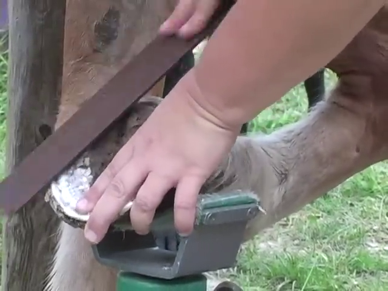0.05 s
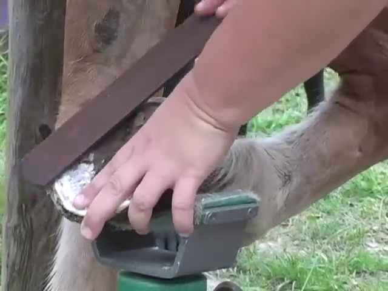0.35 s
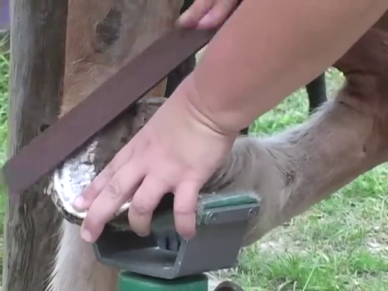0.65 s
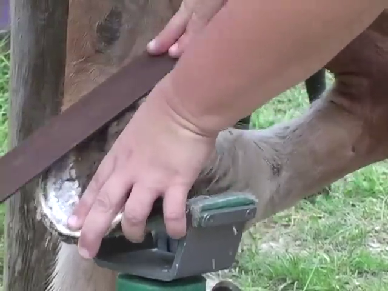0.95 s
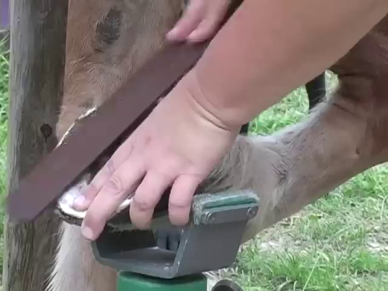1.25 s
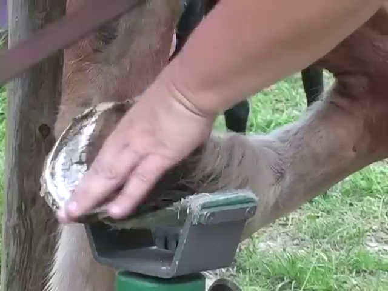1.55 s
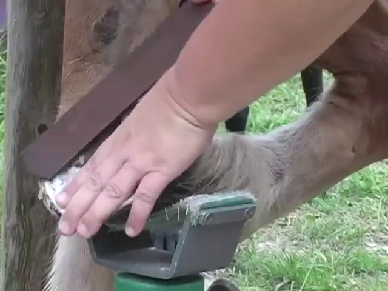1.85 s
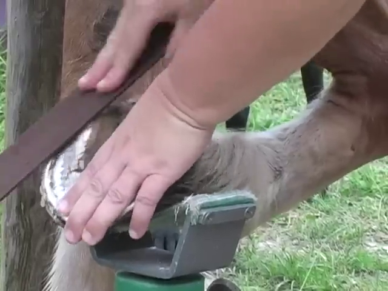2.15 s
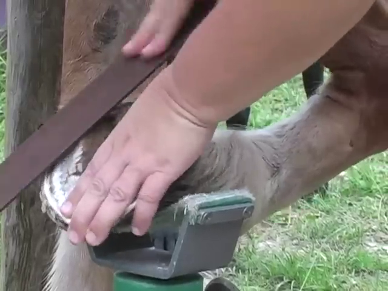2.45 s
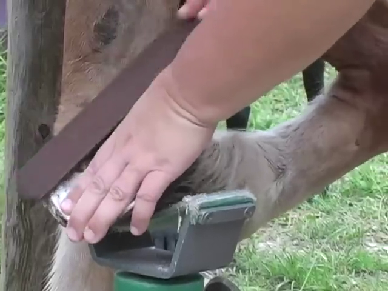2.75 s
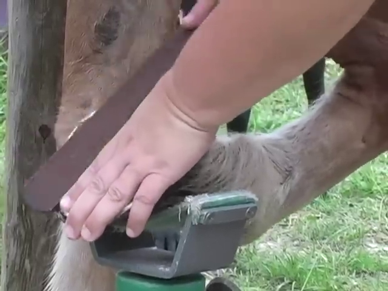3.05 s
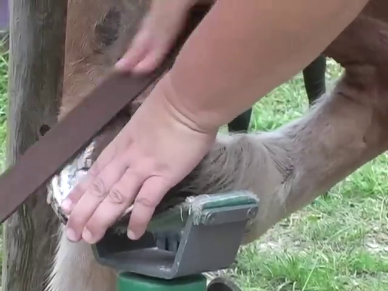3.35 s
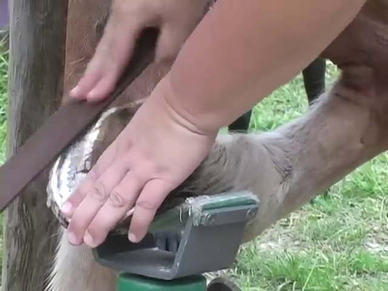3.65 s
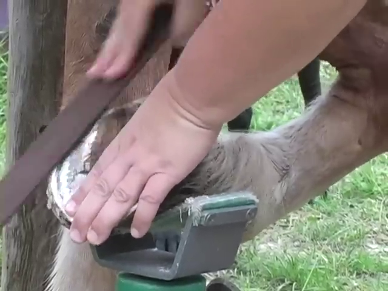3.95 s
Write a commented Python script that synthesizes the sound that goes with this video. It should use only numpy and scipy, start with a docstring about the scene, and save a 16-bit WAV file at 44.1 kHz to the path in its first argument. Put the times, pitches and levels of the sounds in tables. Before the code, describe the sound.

Close, rhythmic filing of a horse's hoof outdoors, with low thumps and sharp clicks.

```python
"""Outdoors in quiet open air, one microphone close to a horse's hoof on a farrier's stand.
A steel rasp pushes heavily and drags back lightly, with one pause while the hand shifts its hold.
The teeth tear the horn in thousands of tiny cuts that ring the blade; coarser slips thump the hoof.
Now and then the rasp snags or judders, and a few sharp clicks stand out.
Nearby surfaces give a faint, dull echo; behind it all lie a soft hush and a low hum."""
import sys
import numpy as np
from scipy import signal
from scipy.fft import rfft, irfft, next_fast_len
from scipy.io import wavfile
from scipy.ndimage import uniform_filter1d, map_coordinates

SR = 44100
rng = np.random.default_rng(int(sys.argv[2]) if len(sys.argv) > 2 else 0)


def wav_out(sig):
    """Save sig, one row per channel (or a flat mono array), as 16-bit PCM at SR to the path in sys.argv[1]."""
    wavfile.write(sys.argv[1], SR, np.round(np.clip(np.atleast_2d(sig).T, -1, 1) * 32767).astype(np.int16))


N = 176400  # 4 s
CHATTER_PER_S, CONTACT_PER_S = 105.1, 28  # how fast the teeth's grip and the contact point wander


def amp(db):
    """Decibels to gain."""
    return 10 ** (np.asarray(db) / 20)


def rms(x):
    """Root-mean-square level."""
    return np.sqrt(np.mean(x ** 2) + 1e-20)


def unit(x):
    """Scale to rms 1."""
    return x / rms(x)


def peak(x):
    """Scale to peak 1."""
    return x / np.abs(x).max()


def bell(x, centre, width):
    """A Gaussian bump of height 1."""
    return np.exp(-.5 * ((x - centre) / width) ** 2)


def along(points, hz):
    """Interpolate (frequency, value) points on a log frequency axis."""
    f, v = np.transpose(points)
    return np.interp(np.log(hz + 1), np.log(f + 1), v)


def wobble(rate, size):
    """A smooth random curve with `rate` knots a second."""
    return map_coordinates(rng.standard_normal(4096), [np.arange(size) * rate / SR], mode="wrap")


def filtered(x, response):
    """Pass x through a complex response of frequency."""
    m = next_fast_len(len(x) + 4096)
    return irfft(rfft(x, m) * response(np.fft.rfftfreq(m, 1 / SR)), m)[:len(x)]


def causal(db):
    """The minimum-phase response that has these gains on an FFT grid."""
    cepstrum = irfft(np.log(amp(db)))
    cepstrum[1:len(db) - 1] *= 2
    cepstrum[len(db):] = 0
    return np.exp(rfft(cepstrum))


def ring(x, modes):
    """Pass x through resonances of alternating sign (frequency [Hz], width [Hz], gain [dB])."""
    return filtered(x, lambda f: sum(
        (-1) ** k * amp(db) * 1j * f * width / (hz * hz - f * f + 1j * f * width)
        for k, (hz, width, db) in enumerate(modes)))


def add(track, start_s, sound):
    """Mix a sound into the track at start_s."""
    part = track[round(start_s * SR):][:len(sound)]
    part += sound[:len(part)]


def impacts(rate, size, scatter_db):
    """Randomly timed impulses of uneven strength, about `rate` a second."""
    hits = (rng.random(size) < rate / SR) * rng.choice([-1, 1], size)
    return hits * amp(scatter_db * rng.standard_normal(size))


# Open air all around the microphone (frequency [Hz], relative level [dB])
AIR_SPECTRUM = [(20, -33), (45, -8.5), (80, -14.5), (200, -12.5), (290, -21.5), (600, -28), (1200, -31),
                (2000, -34.5), (4000, -38.5), (7000, -44), (16000, -48.5)]

def air():
    """The background: a quiet hush, a high band like far insects and a faint, wavering hum."""
    hush = unit(filtered(rng.standard_normal(N), lambda f: amp(along(AIR_SPECTRUM, f))))
    insects = unit(filtered(rng.standard_normal(N), lambda f: bell(f, centre=8030, width=380)))
    hum_hz = 80.3 + 2 * wobble(5.97, N)
    hum = np.sin(2 * np.pi * np.cumsum(hum_hz) / SR)
    return amp(-45 + wobble(6.37, N)) * hush + amp(-64) * insects + amp(-42.5 + 1.4 * wobble(4.1, N)) * hum


def echo(work, db=-15, t60_s=.22, top_hz=1500, delay_s=.003):
    """Nearby surfaces send a faint, dull answer back to the microphone."""
    t = np.arange(SR // 4) / SR
    tail = rng.standard_normal(len(t)) * amp(-60 * t / t60_s) * (t > delay_s)
    tail = filtered(tail / np.linalg.norm(tail), lambda f: 1 / (1 + 1j * f / top_hz) ** 2)
    return amp(db) * signal.fftconvolve(work, tail)[:N]


def hand_shift(lift_s=1.42, ring_t60_s=2.2, slide_start_s=1.4, slide_length_s=.32, rub_hz=1860):
    """The lifted blade rings on faintly while the hand slides to a new hold on the hoof."""
    out, t = np.zeros(N), np.arange(SR) / SR
    add(out, lift_s, amp(-54 - 60 * t / ring_t60_s) * np.sin(2 * np.pi * BLADE_MODE_HZ[1] * t))
    slide = np.sqrt(np.abs(np.sin(np.pi * np.minimum(t / slide_length_s, 1))))
    rub = unit(ring(rng.standard_normal(SR), [(rub_hz, rub_hz / 2, 0)]))
    add(out, slide_start_s, amp(-59 + 1.3 * wobble(20, SR)) * slide * rub)
    return out


# Sharp clicks close to the microphone (time [s], peak level [dB], treble lift [dB])
CLICK_HITS = [(0.284, -24, 43), (0.558, -26, 12), (0.6084, -1.5, -0.5), (.712, -18, -23),
              (0.992, -21.5, 22), (1.196, -28.5, 27), (1.708, -32, 31), (1.879, -28.5, 11),
              (2.508, -13.5, 28), (2.602, -28, 33)]
# Resonances of a click (frequency [Hz], width [Hz], gain [dB])
CLICK_RESONANCES = [(970, 51, 0.5), (1197, 62, 2.5), (1480, 360, 2), (1900, 100, 3.5), (2420, 220, 8),
                    (3010, 450, 4), (3480, 310, 7.5), (4180, 390, 3), (5200, 690, -5.5)]
# Overall tone of a click (frequency [Hz], gain [dB])
CLICK_SPECTRUM = [(200, -39), (900, 7), (4300, -2), (7000, -2), (16000, -18)]
# Shape of a treble lift, for clicks and the scrape (frequency [Hz], share of the lift [0-1])
LIFT_SHAPE = [(2500, 0), (9000, 1)]

def clicks(rattle_gain=.08, rattle_t60_s=.031):
    """Hard, short contacts, each with a brief rattle after it."""
    out, t = np.zeros(N), np.arange(SR // 8) / SR
    for start, db, treble_db in CLICK_HITS:
        rattle = rattle_gain * rng.standard_normal(len(t)) * amp(-60 * t / rattle_t60_s)
        click = ring((t == 0) + rattle, CLICK_RESONANCES)
        click = filtered(click, lambda f: causal(along(CLICK_SPECTRUM, f) + treble_db * along(LIFT_SHAPE, f)))
        add(out, start, amp(db) * peak(click))
    return out


# The hoof on its stand (frequency [Hz], width [Hz], gain [dB])
HOOF_MODES = [(89.3, 58, -10.5), (163.1, 21.1, 0.5), (217.8, 46, -7.5), (378, 43.6, -16.5),
              (567.4, 22.4, -14.5)]

def hoof(force):
    """Hoof and stand answer a force with a low thump."""
    return ring(force, HOOF_MODES)


def stand_rocking(stroke_share=.36, width_s=.016):
    """Early in each push the weight comes on and rocks the stand in its lowest mode."""
    t = np.arange(N) / SR
    swell = sum(amp(thump_db - .5) * bell(t, start + stroke_share * (end - start), width_s)
                for start, end, *_, thump_db, _, _, _ in PUSH_STROKES)
    rock_hz = HOOF_MODES[0][0] * (1 + .152 * wobble(CONTACT_PER_S, N))
    return swell * np.sin(2 * np.pi * np.cumsum(rock_hz) / SR)


# The steel blade's modes, in two matching lists (frequency [Hz]) and (gain [dB])
BLADE_MODE_HZ = [950, 1497, 2090, 2425, 2830, 3632, 4502, 5410, 6490, 7690, 8910]
BLADE_MODE_DB = [-6, 1.5, 5, 2.5, 5.5, 6.5, 6, 0.5, -4, -5, -6]

def blade(force, width_hz=28, zing_hz=10785, zing_width_hz=44, contact_db=5):
    """The steel's ring and its high zing; each mode's drive varies as the contact slides along."""
    def drive():
        return force * amp(contact_db * np.clip(wobble(CONTACT_PER_S, len(force)), -2, 1))
    body = sum(ring(drive(), [(hz, width_hz, db)]) for hz, db in zip(BLADE_MODE_HZ, BLADE_MODE_DB))
    zing = ring(drive(), [(zing_hz, zing_width_hz, 0)])
    return body, zing


# Judders within the pushes (start [s], end [s], slip rate [Hz], level [dB])
JUDDER_SPANS = [(.11, .175, 184, -23), (2.075, 2.14, 213, -23), (2.84, 2.919, 168, -26.5),
                (3.25, 3.312, 169, -22), (3.54, 3.595, 163, -21), (3.61, 3.675, 158, -22)]

def judders(jitter=.076):
    """The teeth stick and slip near the hoof's resonances, making a short, uneven drone."""
    out = np.zeros(N)
    for start, end, slip_hz, db in JUDDER_SPANS:
        size = round((end - start) * SR)
        turns = np.cumsum(slip_hz * (1 + jitter * wobble(CHATTER_PER_S, size))) / SR
        swell = np.sin(np.linspace(0, np.pi, size))
        add(out, start, amp(db) * unit(np.sin(2 * np.pi * turns) * swell))
    return out


# The rasp lands or snags, heard close (time [s], grip change [dB], thump [dB], crunch [dB])
SNAG_HITS = [(.712, 18, -26.5, -25.5), (0.817, 12, -36, -42), (0.828, 10, -22, -47),
             (0.842, 15, -11, -21.5), (0.871, 10.5, -25, -29), (.882, 17.5, -22, -19.5),
             (.894, 5, -18, -17), (.908, 15.5, -25, -30), (1.29, 3.5, -12.5, -37), (1.315, 6, -13, -15.5),
             (1.364, 9, -17.5, -20), (1.386, 6, -12, -43), (1.409, 15, -22, -35), (1.88, -5, -12.5, -21.5),
             (2.047, -12, -9, -21.5), (2.428, 6.5, -24, -27), (2.447, 5, -11.5, -16), (2.464, 14, -35, -15),
             (2.486, 10.5, -7.5, -9), (2.507, 10.5, -8, -38), (2.527, -1, -14.5, -9),
             (2.547, -4, -11, -13.5), (2.565, -2, -17.5, -17), (2.792, -0.5, -12.5, -28),
             (3.167, 4, -13, -40), (3.195, 0.5, -13, -33)]
# The dull crunch of a snag (frequency [Hz], relative level [dB])
CRUNCH_SPECTRUM = [(100, -19), (350, -4), (600, 4), (1000, 1), (1700, -10), (3000, -24.5), (8000, -36)]

def snags(contact_s=.0018, crunch_t60_s=.091, ping_db=-19):
    """A tooth catches and breaks free: a soft knock on the hoof, a crunch and a ping of the blade."""
    out, t = np.zeros(N), np.arange(SR // 4) / SR
    knock = peak(hoof(np.sin(np.pi * t / contact_s) ** 2 * (t < contact_s)))
    for start, _, thump_db, crunch_db in SNAG_HITS:
        burst = rng.standard_normal(len(t)) * amp(-60 * t / crunch_t60_s)
        crunch = peak(filtered(burst, lambda f: causal(along(CRUNCH_SPECTRUM, f))))
        body, zing = blade(t == 0)
        ping = amp(ping_db) * peak(peak(body) + peak(zing))  # relative to the crunch
        add(out, start, amp(thump_db) * knock + amp(crunch_db) * (crunch + ping))
    return out


def snag_grip_db(t, width_s=.0036):
    """A snag changes the grip of the teeth for a few milliseconds, most often tightening it."""
    return sum(db * bell(t, when, width_s) for when, db, _, _ in SNAG_HITS)


# Tone curves scaled by a stroke's treble and bite (frequency [Hz], gain per dB of setting [dB])
TREBLE_CURVE = [(3000, -2), (9000, 1)]
BITE_CURVE = [(700, -0.69), (1500, -0.43), (2800, -0.11), (4200, -0.33), (8000, 0.29)]

def tearing_horn(cuts, speed, length_s, treble_db, bite_db, opening_db=6, ripple_db=4):
    """The tone of the tiny cuts flickers in patches, and the top opens as the stroke goes on."""
    hz, when, spectrum = signal.stft(cuts, SR, nperseg=512)
    hz = hz[:, None]
    patches = uniform_filter1d(rng.standard_normal(spectrum.shape), 3, axis=0)
    patches = unit(uniform_filter1d(patches, 10, axis=1))
    slowness = 1 - np.interp(when, np.arange(len(cuts)) / SR, speed)
    tilt_db = along(TREBLE_CURVE, hz) * (treble_db - .5 * slowness) + along(BITE_CURVE, hz) * bite_db
    top_db = along(LIFT_SHAPE, hz) * opening_db * (np.minimum(when / length_s, 1) - .5)
    spectrum = spectrum * amp(tilt_db + top_db + ripple_db * patches)
    return signal.istft(spectrum, nperseg=512)[1][:len(cuts)]


def stroke(row, colour, thump_swell, cuts_per_s=5000, slips_per_s=260, size=16384):
    """The rasp speeds up and slows: fine cuts scrape and ring the blade, coarse slips thump the hoof."""
    start, end, fastest, swell, scrape_db, bite_db, treble_db, thump_db, ring_db, zing_db, chatter_db = row
    t, length_s = np.arange(size) / SR, end - start
    travel = np.interp(t, [0, length_s * np.clip(fastest, .1, .9), length_s], [0, .5, 1])
    speed = np.abs(np.sin(np.pi * travel)) * (travel < 1)
    chatter = np.clip(wobble(CHATTER_PER_S, size), -2, 2)
    grip = amp(chatter_db * chatter + .5 * wobble(699.7, size))
    force = speed ** swell * amp(snag_grip_db(start + t))
    weight = speed ** thump_swell
    cuts = impacts(cuts_per_s, size, scatter_db=2.5)
    torn = tearing_horn(cuts, speed, length_s, treble_db, bite_db)
    scrape = filtered(torn * force * grip, lambda f: causal(along(colour, f)))
    slips = impacts(slips_per_s, size, scatter_db=3) + .33 * impacts(cuts_per_s, size, scatter_db=1)
    thump = amp(thump_db) * unit(hoof(slips * grip * weight))
    body, zing = blade(cuts * force * grip)
    steel = amp(ring_db) * unit(body) + amp(zing_db) * unit(zing * speed)
    return rms(force) * (amp(scrape_db) * unit(scrape) + steel) + rms(weight) * thump


# Heavy pushes and light returns, close to the microphone; levels hold at full force
# (start [s], end [s], fastest point [share of stroke], swell [exponent], scrape [dB], bite [dB],
#  treble [dB], thump [dB], blade ring [dB], zing [dB], chatter depth [dB])
PUSH_STROKES = [(.041, 0.194, 0.35, 0.56, -23.5, 1, -1.5, -20, -37, -42, 0.2),
                (0.41, 0.556, 0.62, 0.87, -22.5, 1, -1.5, -20.5, -39, -35, 2),
                (0.813, 0.931, 0.078, 0.16, -40, 0.5, -1.5, -21.5, -54, -47.5, 1.5),
                (1.204, 1.418, 0.54, 1.12, -29.5, 3.5, -3.5, -26, -45, -43.5, 3),
                (1.942, 2.162, 0.75, 0.87, -26.5, 1, -1.5, -22, -42, -40, 0.5),
                (2.397, 2.551, 0.34, 0.24, -34, 4, -1.5, -19.5, -42.5, -40, 2.5),
                (2.773, 2.917, 0.64, 0.43, -25, -5, 0.5, -24, -33.5, -43, 1),
                (3.148, 3.311, 0.6, 0.7, -25.5, -6, -0.5, -24, -36, -43.5, -0.5),
                (3.51, 3.671, 0.62, 1, -23, -10.5, 2, -26.5, -37.5, -44, 0.5),
                (3.902, 4.053, 0.26, 0.86, -24, -4, 0, -24, -37.5, -42, 2)]
RETURN_STROKES = [(0.218, 0.379, 0.52, 1.6, -32.5, 1.8, -3, -37.5, -39.5, -41.5, 1.5),
                  (0.624, 0.739, 0.085, 2.12, -34, -1, -1, -31.5, -38.5, -41.5, 1.4),
                  (1.047, 1.186, 0.56, 0.8, -41, 0, -2.5, -35.5, -52, -67, 3.9),
                  (2.2, 2.359, 0.49, 1.1, -32, 2.5, -2, -33, -42.5, -44, 0.72),
                  (2.602, 2.737, 0.39, 1.8, -29, -8.5, 0, -30.5, -41, -42, 0.38),
                  (2.94, 3.107, 0.62, 1.3, -33, -8, -2.5, -37, -39, -48, 1.3),
                  (3.321, 3.495, 0.42, 1.83, -29.5, -3, -2.5, -41.5, -38.5, -45, 1.5),
                  (3.69, 3.85, 0.46, 1.5, -29.5, -4.5, -2, -37.5, -39, -45, 0.9)]
# The scrape of the horn in each direction (frequency [Hz], relative level [dB])
PUSH_SPECTRUM = [(60, -25), (200, -11.5), (340, 0), (480, -9.5), (580, -3), (700, -6), (900, -8.5),
                 (1100, -13), (1650, -7), (2200, -15.5), (2900, -9), (4100, -11.5), (4700, -15.5),
                 (12000, -21.5), (16000, -29.5)]
RETURN_SPECTRUM = [(100, -48), (260, -4.5), (380, -5.5), (520, -0.5), (800, -8), (1150, -10), (1500, -6),
                   (2300, -16), (4200, -12), (5400, -19.5), (12000, -22), (16000, -26)]

def rasping():
    """Pushes cut deep; returns skate over the horn."""
    out = np.zeros(N)
    for row in PUSH_STROKES:
        add(out, row[0], stroke(row, PUSH_SPECTRUM, thump_swell=.67))
    for row in RETURN_STROKES:
        add(out, row[0], stroke(row, RETURN_SPECTRUM, thump_swell=.22))
    return out


def scene():
    """The farrier's work up close, its faint echo and the open air behind, in mono."""
    work = rasping() + judders() + stand_rocking() + snags() + clicks() + hand_shift()
    return (work + echo(work) + air())[None]


def record(dry, low_cut_hz=59, top_hz=16000):
    """The camera's microphone thins the deepest bass and keeps nothing above its band limit."""
    return filtered(dry[0], lambda f: (1j * f / (low_cut_hz + 1j * f)) ** 2 * (f < top_hz))[None]


dry = scene()
out = record(dry)
wav_out(out)
```